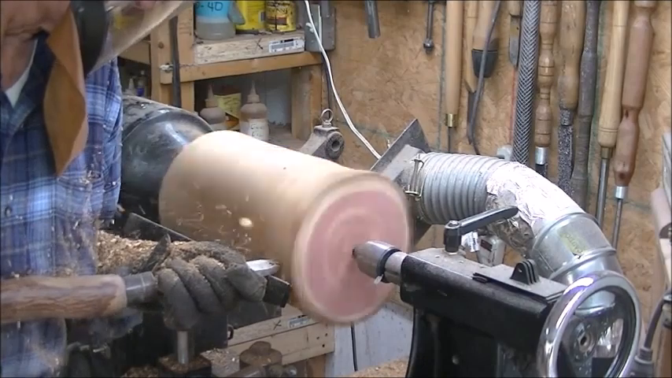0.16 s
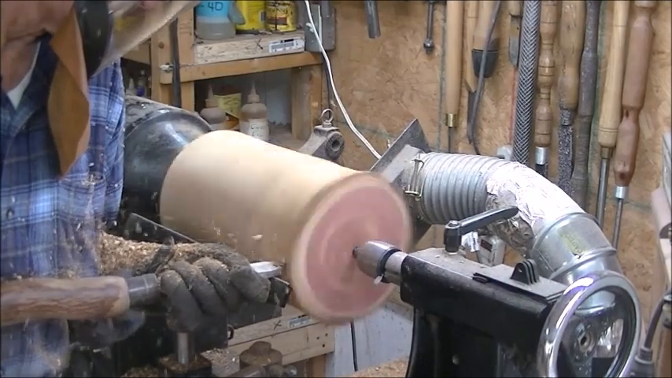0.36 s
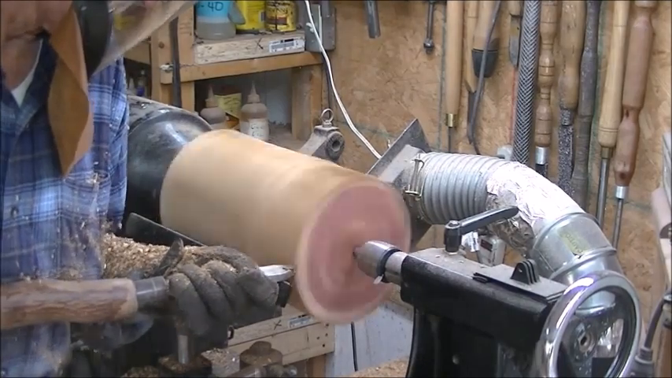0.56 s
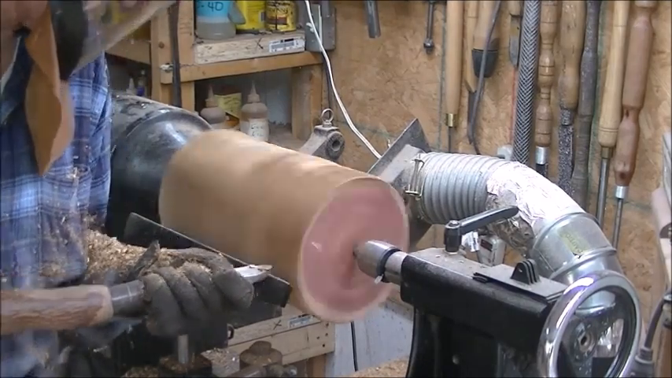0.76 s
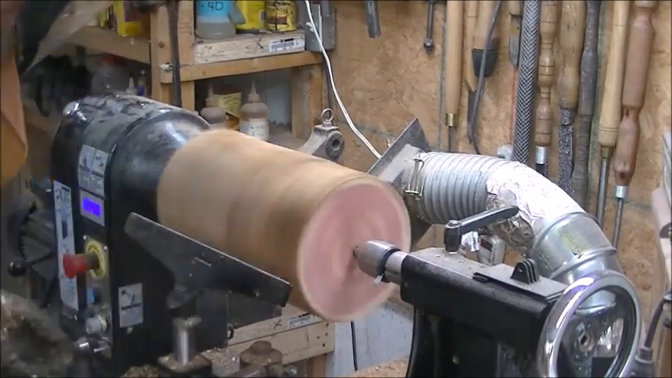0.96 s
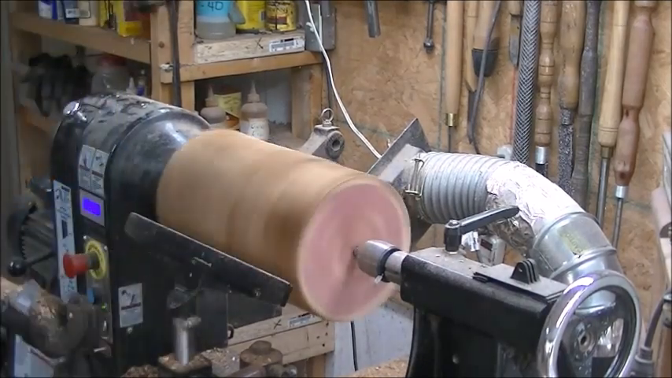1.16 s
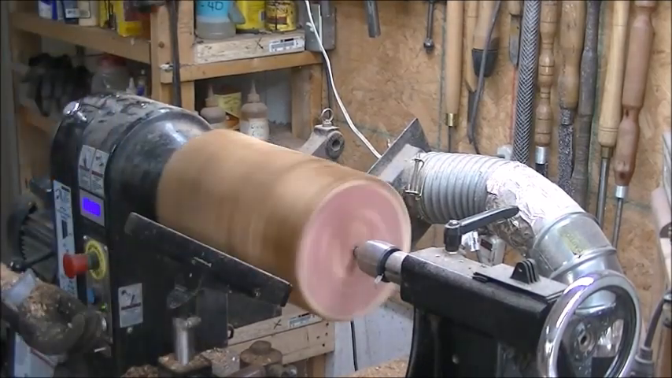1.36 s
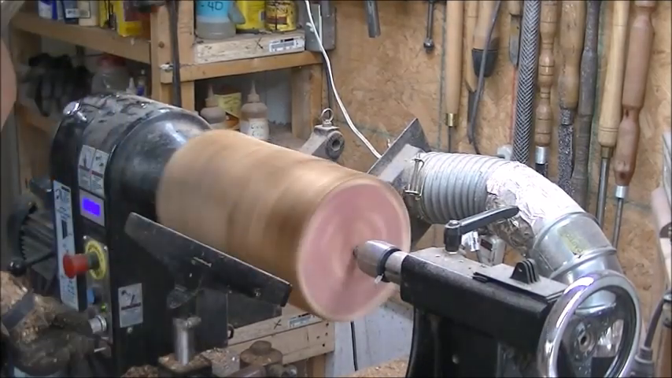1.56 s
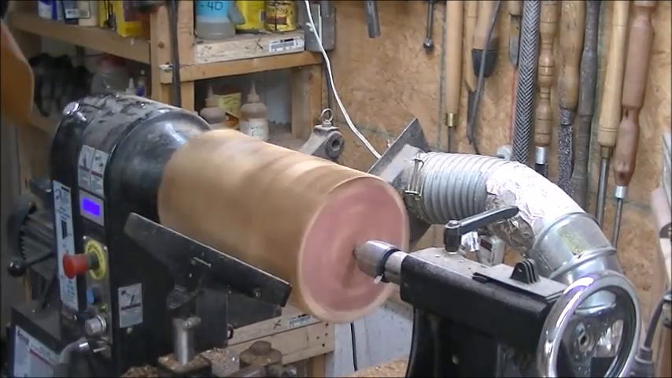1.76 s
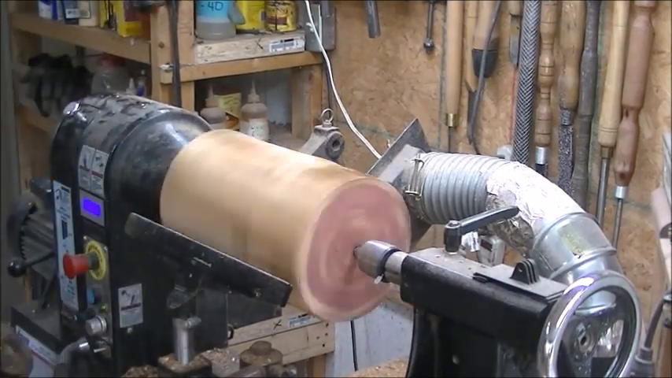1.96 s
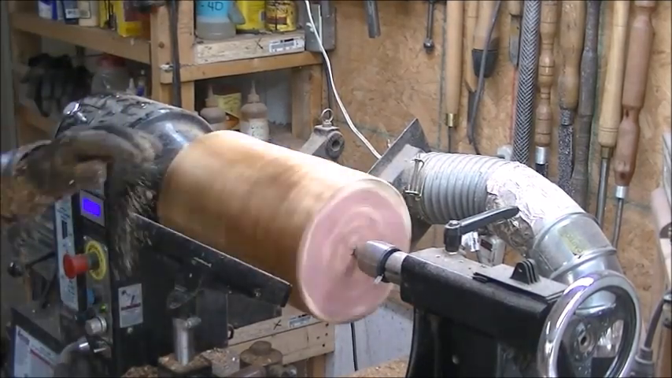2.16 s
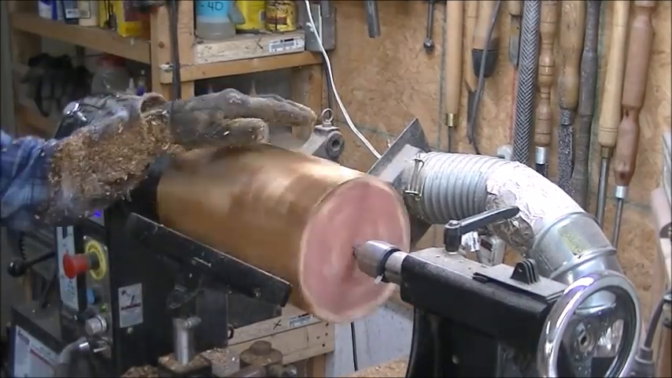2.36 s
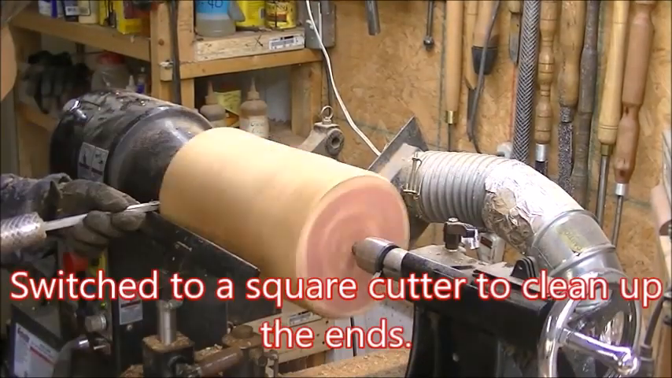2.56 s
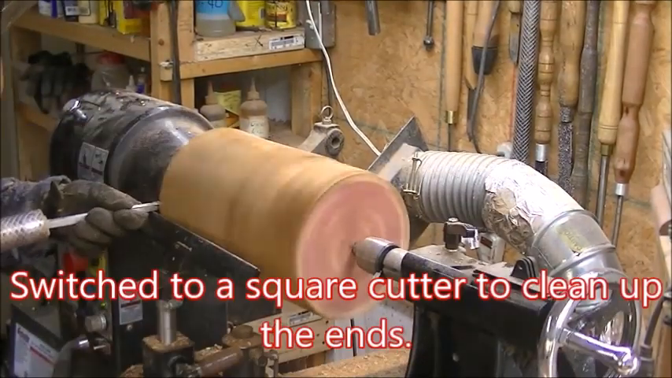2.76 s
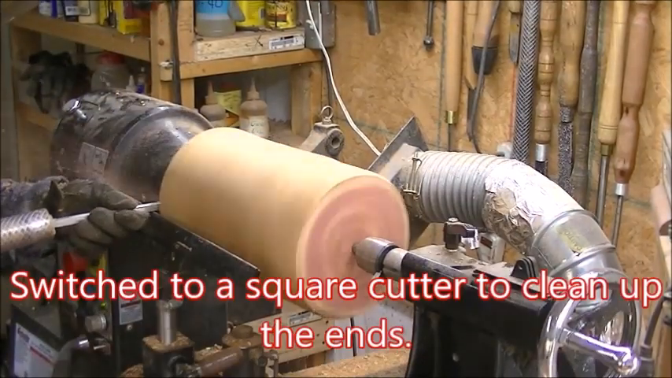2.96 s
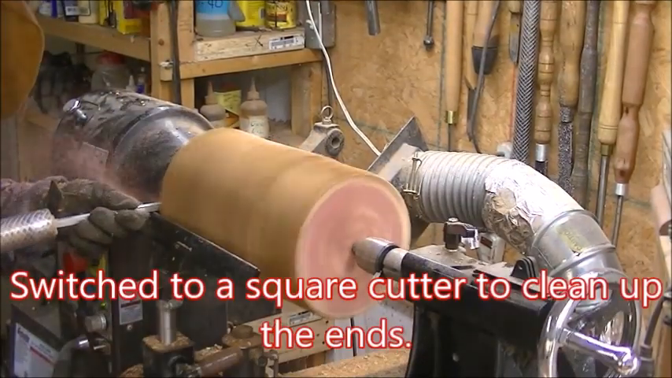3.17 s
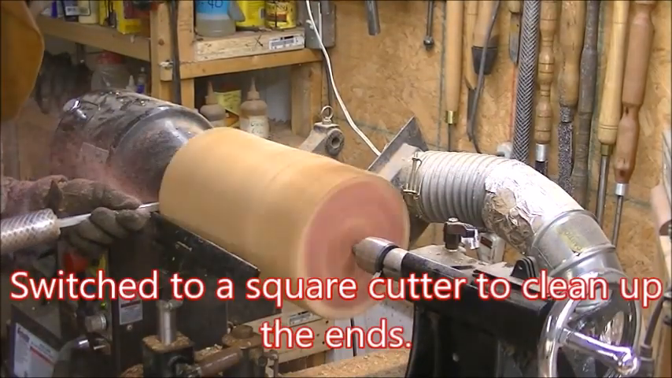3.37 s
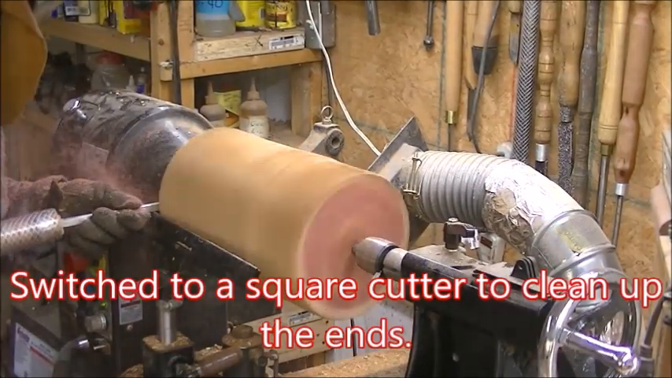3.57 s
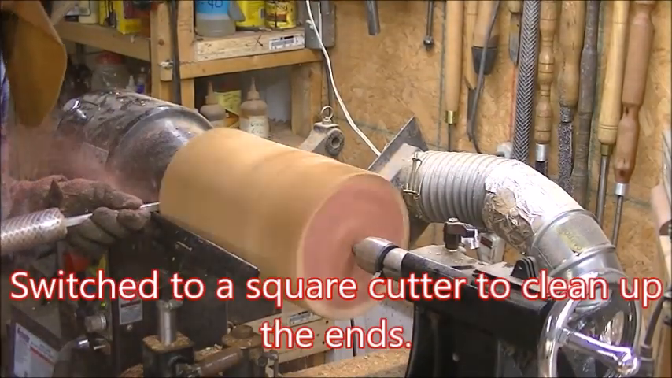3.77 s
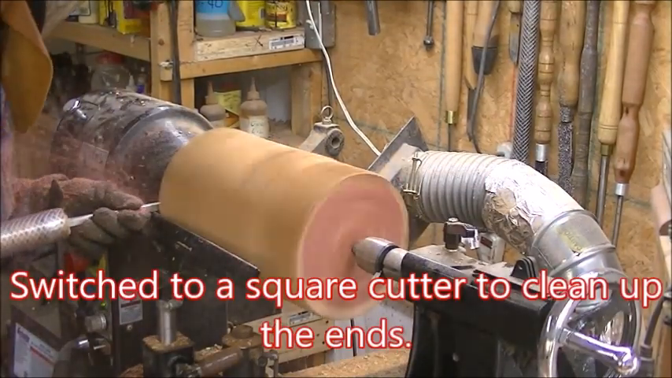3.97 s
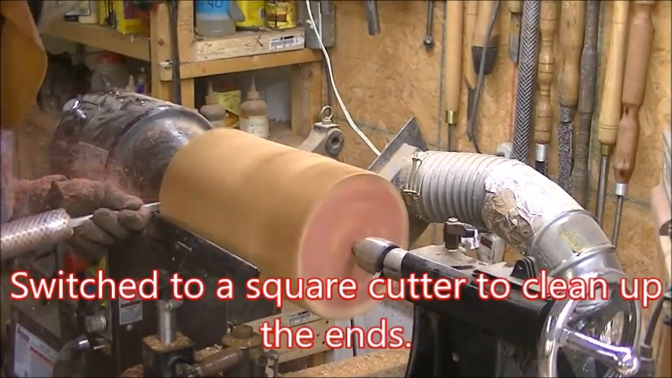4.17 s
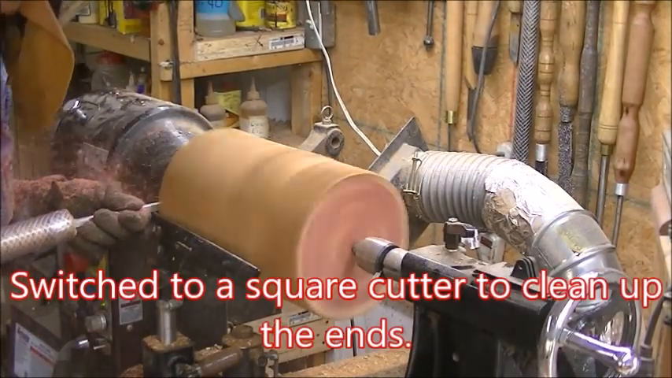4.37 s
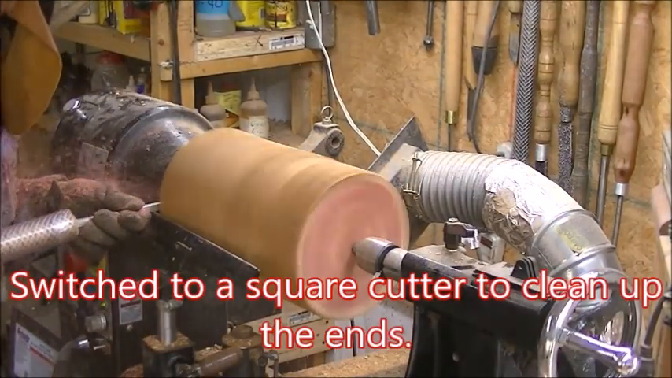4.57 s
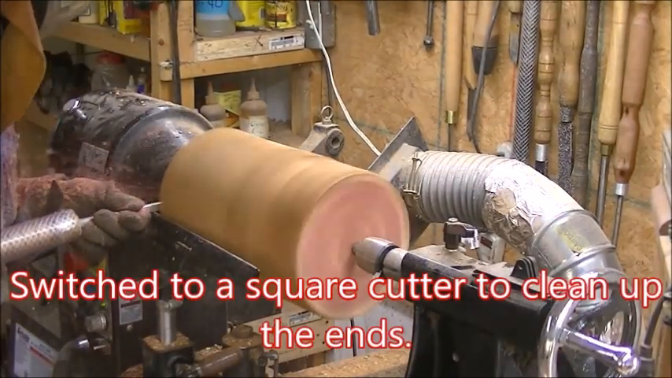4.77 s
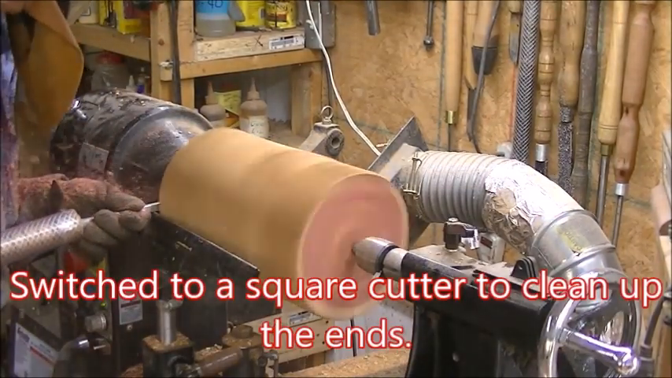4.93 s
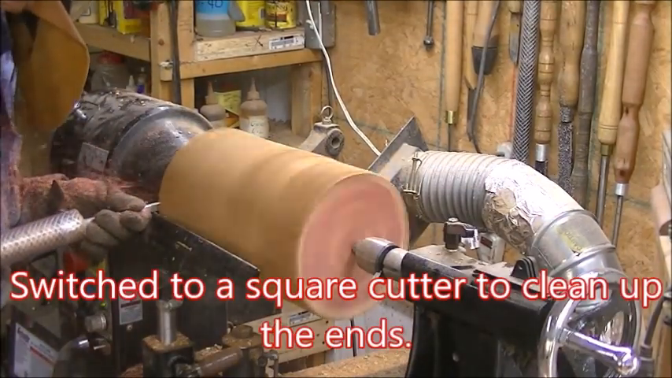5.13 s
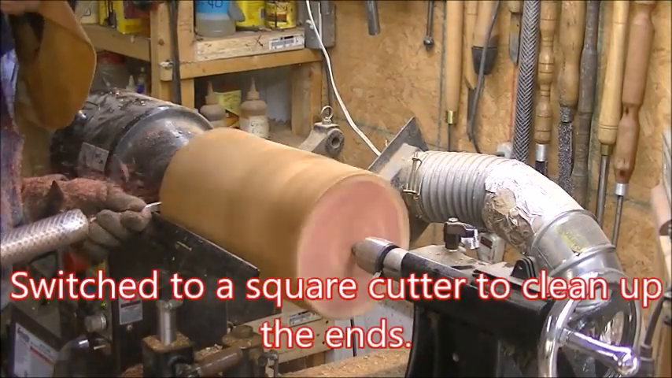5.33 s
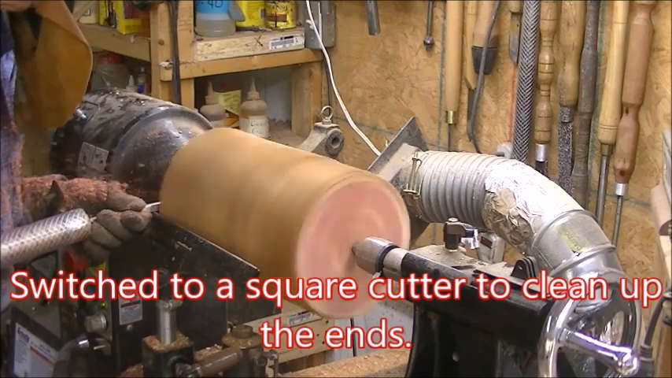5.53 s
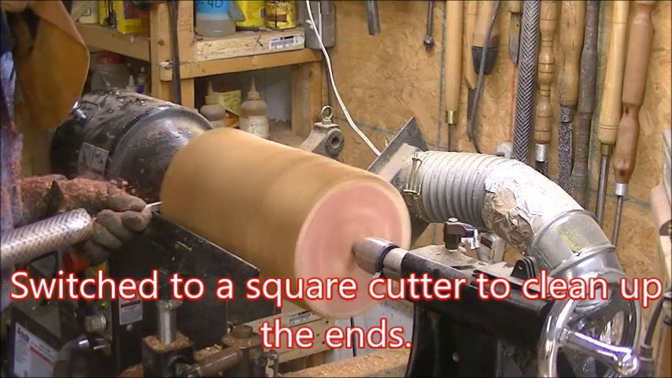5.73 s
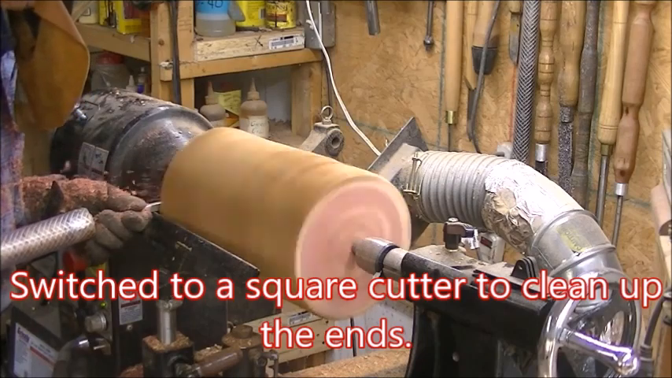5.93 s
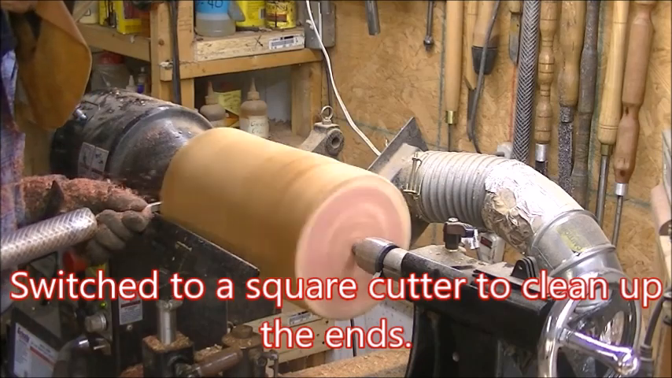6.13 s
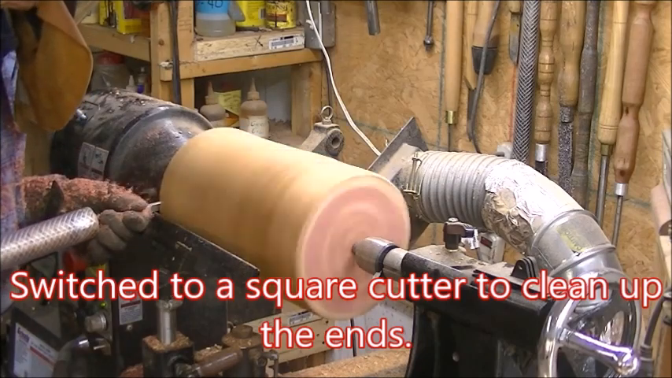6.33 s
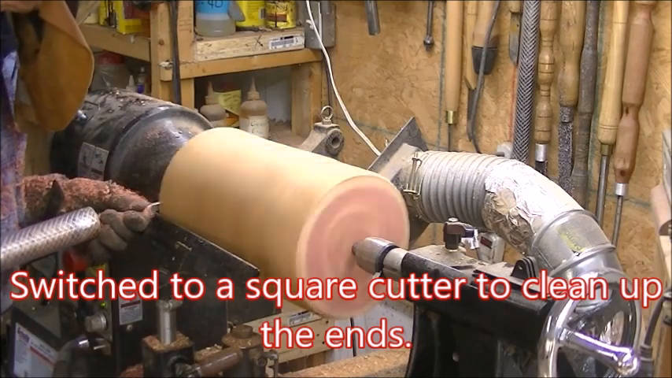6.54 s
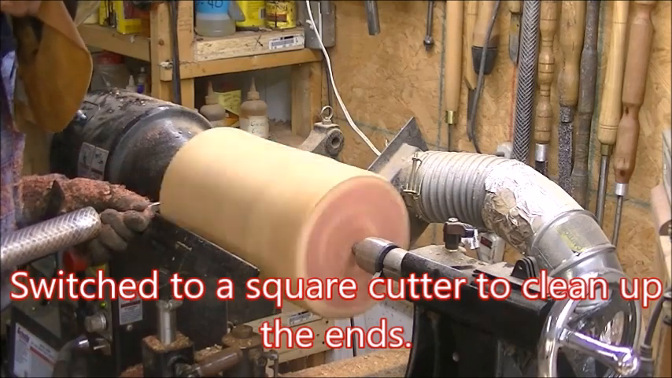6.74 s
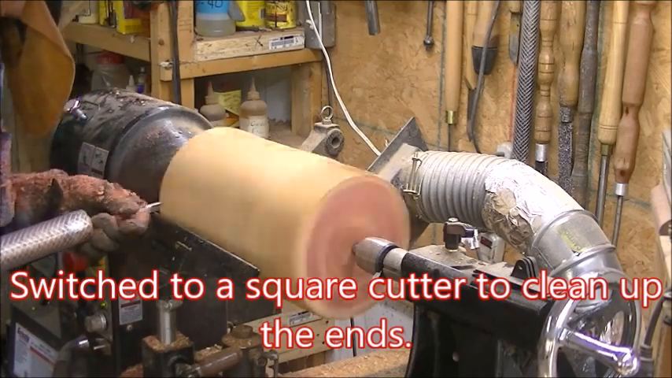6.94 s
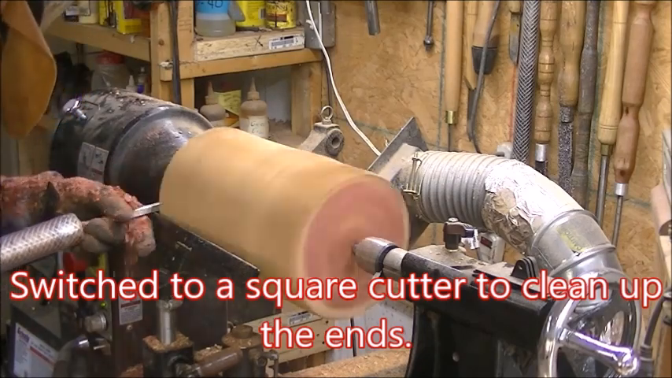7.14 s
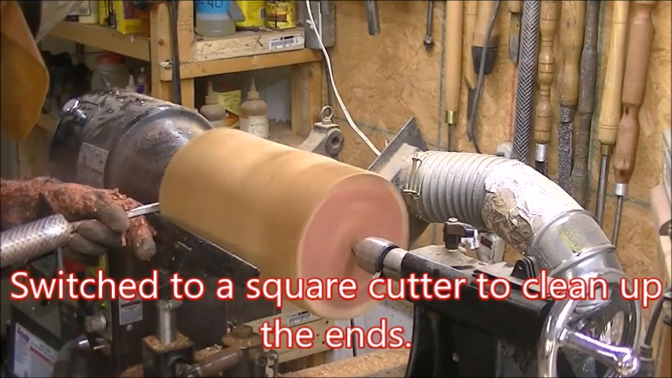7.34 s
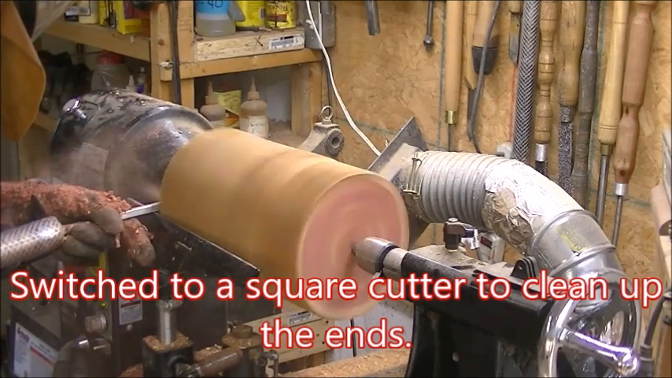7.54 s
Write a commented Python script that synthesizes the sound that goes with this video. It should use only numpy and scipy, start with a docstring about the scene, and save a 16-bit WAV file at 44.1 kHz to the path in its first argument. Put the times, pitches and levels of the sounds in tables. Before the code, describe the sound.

Gouge hisses harshly on spinning wood, lifts off, lathe whines down with soft knocking, restarts, then a square cutter grinds a long loud raspy hiss.

```python
"""Roughing and grooving on a wood lathe

A gouge roughs a spinning blank, lifts away, and the lathe coasts down with a falling whine.
It runs up again and a square cutter sinks a groove into the end, its hiss darkening with depth.
The cuts are grainy noise through resonances; the whine is made of sines tied to the spindle speed.
Puffs of air and shavings are short bursts of noise at two microphone ports.
The small, dry workshop answers with short tails of fading noise."""
import sys
import numpy as np
from scipy import signal
from scipy.fft import rfft, irfft, next_fast_len
from scipy.io import wavfile
from scipy.ndimage import uniform_filter1d, map_coordinates

SR = 44100
rng = np.random.default_rng(int(sys.argv[2]) if len(sys.argv) > 2 else 0)


def transcribe(signal):
    """Save signal, clipped to [-1, 1], as a 16-bit WAV file at the path in sys.argv[1]."""
    frames = np.atleast_2d(signal).T
    limited = np.clip(frames, -1, 1)
    pcm = np.round(limited * 32767).astype(np.int16)
    wavfile.write(sys.argv[1], SR, pcm)


N = 339570

# In every spectrum below (relative level [dB per Hz]) only the shape counts; its loudness is set elsewhere.
# strokes of the gouge: (start [s], end [s], level [dB])
GOUGE_STROKES = [(-0.02, 0.62, -18), (0.71, 0.71, -15), (0.735, 0.831, -17.5)]
# how hard the cutter is pressed, easing off at the bottom of the groove: (time [s], level [dB])
CUTTER_PRESSURE = [(2.78, -40), (2.86, -27), (2.885, -19), (3.05, -16), (4.7, -15.5), (5.8, -16),
                   (6.78, -18.5), (6.83, -28), (6.87, -28.5), (6.9, -20), (7.01, -19), (7.07, -15),
                   (7.22, -21.5), (7.36, -16), (7.45, -19), (7.7, -16)]
# the cutter grazes the blank before it bites: (start [s], end [s], level [dB])
CUTTER_GRAZES = [(2.763, 2.77, -20), (2.848, 2.852, -20), (2.868, 2.876, -19)]
# the cutter sinks in slowly and is drawn back quickly: (time [s], depth [mm])
CUTTER_DEPTH = [(2.87, 0), (3.05, 0.63), (3.4, 0.6), (4.1, 5), (4.8, 14), (5.6, 20.5), (6.9, 25),
                (7.1, 19.5), (7.3, 8.5), (7.4, 5), (7.52, 2), (7.7, 1)]
# strength of the slot's resonance in a firm cut: (depth [mm], lift [dB])
SLOT_LIFT = [(0, 1.5), (.55, 12.5), (4, 7.5), (12, 2.5), (23, 11)]
# fibres tearing under the gouge: (frequency [Hz], relative level [dB per Hz])
GOUGE_SPECTRUM = [(150, -54), (350, -47), (600, -51), (900, -20), (1150, -13.5), (1350, -8), (1550, -11),
                  (2100, -9), (3000, -3), (4200, -4), (6000, -4), (9000, 0.5), (15600, -5.5)]
# fibres tearing under the cutter: (frequency [Hz], relative level [dB per Hz])
CUTTER_SPECTRUM = [(150, -52), (350, -45.5), (600, -29.5), (900, -16), (1150, -14), (1350, -9.5),
                   (1550, -10.5), (2100, -20.5), (3000, 1.5), (4200, -0.5), (6000, -1.5), (9000, 1.5),
                   (15600, 2.5)]
# blank, rest and gouge ringing: (frequency [Hz], width [Hz], lift [dB])
GOUGE_RESONANCES = [(1508, 44, 7.8), (1685, 165, 10.1), (1906, 28, 10.9), (2304, 143, 6.7), (2664, 61, 8.8),
                    (2906, 127, 10.5), (5262, 138, 8.8), (5535, 101, 10.0), (5791, 153, 13.1),
                    (6055, 248, 10.1), (6791, 117, 7.1), (7637, 699, 5.4), (9792, 299, 7.6),
                    (12417, 238, 7.9)]
# blank, rest and cutter ringing: (frequency [Hz], width [Hz], lift [dB])
CUTTER_RESONANCES = [(1574, 188, 16.0), (1693, 97, 14.9), (1840, 117, 13.0), (1997, 274, 16.0),
                     (2271, 405, 16.0), (2491, 253, 16.0), (2677, 31, 7.7), (2808, 25, 11.2),
                     (2934, 144, 13.3), (3143, 234, 9.8), (3789, 71, 4.5), (4354, 63, 5.4),
                     (4608, 320, 6.2), (5218, 43, 5.9), (5416, 593, 9.9), (5828, 118, 5.7),
                     (6198, 399, 8.0), (6900, 437, 6.5), (7775, 699, 7.8), (8540, 232, 4.8),
                     (9864, 399, 10.4), (10247, 139, 6.5), (10510, 120, 4), (11300, 260, 6),
                     (12350, 150, 4), (12780, 380, 10), (14225, 699, 5.8)]
# modes of the rest that the shank wakes as it nears them: (frequency [Hz], width [Hz], full lift [dB])
REST_RESONANCES = [(3835, 330, 14.5), (4270, 220, 9), (4630, 240, 11.5)]
# the bearings' whirr before the restart: (frequency [Hz], relative level [dB per Hz])
WHIRR_SPECTRUM = [(88, -85), (150, -50), (420, -20), (1290, -6.5), (2270, -4), (2500, -7), (2860, -1),
                  (4480, -5), (7130, -6.5), (14100, -17.5), (15500, -20)]
# the spindle's dull knock: (frequency [Hz], relative level [dB per Hz])
KNOCK_SPECTRUM = [(200, -41), (600, -14), (900, -4.5), (1400, 1), (2000, -4), (4000, -7), (12000, -19.5)]
# the restarted lathe: (frequency [Hz], relative level [dB per Hz])
RUN_UP_SPECTRUM = [(150, -43), (300, -40), (700, -23), (1000, -14.5), (1600, -2.5), (3000, -3),
                   (3800, -2.5), (4800, -1), (8000, -4.5), (15000, -9.5)]
# the drive's whine by its pitch, before swells and fits: (frequency [Hz], level [dB])
WHINE_LEVELS = [(1500, -50.5), (3700, -53.5), (4700, -49.5), (6500, -51), (8000, -68), (14000, -72)]
# its upper partial by its own pitch, before swells and fits: (frequency [Hz], level [dB])
UPPER_WHINE_LEVELS = [(4300, -76), (5700, -53.5), (6500, -54), (8000, -66), (14000, -75)]
# housing resonances that the whine sweeps through: (frequency [Hz], width [Hz], lift [dB])
HOUSING_RESONANCES = [(2740, 770, 18), (5830, 2000, 10.5)]
# tones of the motor until the power is cut: (frequency [Hz], level [dB])
MOTOR_TONES = [(1906, -43.5), (5560, -48.5), (5862, -50)]
# hum of the restarted lathe: (frequency [Hz], level [dB])
HUM_TONES = [(203, -91), (608, -79)]
# brief squeaks as the spindle slows: (time [s], frequency [Hz], peak level [dB], length [s])
SQUEAK_LIST = [(1.794, 2110, -43, 0.016), (1.845, 2130, -42, 0.018), (1.91, 2070, -39, 0.023),
               (1.912, 4080, -39.5, .02), (1.912, 2600, -41, 0.012)]
# the strongest puffs on the microphone ports: (time [s], peak level [dB], length [s])
STRONG_PUFFS = [(0.353, -41.5, 0.071), (0.417, -40.5, .021), (0.533, -37, .02), (0.715, -34.5, 0.03),
                (0.925, -35, 0.023), (0.966, -33.5, 0.018), (1.006, -31.5, 0.013), (1.2, -34, .033),
                (1.238, -36, .014), (1.32, -39.5, 0.031), (1.556, -40.5, 0.067), (1.925, -41, 0.048),
                (2.356, -34, 0.022), (2.506, -39, 0.017), (5.238, -34, 0.042), (5.469, -29.5, 0.034),
                (5.545, -40.5, 0.043), (5.635, -39, 0.024), (6.026, -27.5, 0.048), (6.279, -39, 0.026),
                (6.333, -32, 0.0077), (6.5, -26, 0.04), (6.617, -40, 0.03), (6.765, -39.5, 0.074)]
# spells of weaker, random puffs: (start [s], end [s], middle level [dB])
WEAK_PUFF_SPELLS = [(0.36, 1.754, -58.5), (5.207, 6.752, -50.5)]
# rustle of a puff: (frequency [Hz], relative level [dB per Hz])
PUFF_SPECTRUM = [(60, -61), (150, -30.5), (300, -13.5), (550, 1.5), (1000, 8.5), (1600, 6), (3000, -4),
                 (8000, -26)]
# still air of the shop: (frequency [Hz], relative level [dB per Hz])
AIR_SPECTRUM = [(25, -24), (150, -18.5), (300, -13), (600, -1.5), (1500, 13), (5000, -1), (15000, -47)]

POWER_OFF, RESTART, FIRST_BITE = 1.2, 2.56, 2.865  # s
KNOCK_AT = 2.263  # s, one moment when the high spot comes round
SLOW, RESUME, FAST = 50.3, 42.2, 65.2  # end-grain passes a second: roughing, start of the run-up, top speed
BRAKE, SPIN_UP = 26.8, 28  # passes a second lost or gained each second
ATTACK_S, RELEASE_DB_PER_S = 0.009, 550  # the edge catches quickly and slips out more slowly
THROB_DEEP_DB, THROB_SURFACE_DB = 1.37, 1.37  # throb at any depth, and its extra at the surface
ROUNDING_MM = 1.7  # that extra fades over this depth, as the cut rounds the blank off
FIRM_DB, LIGHT_RANGE_DB = -16, 8  # a cut counts as light from this level down, fully so this much lower
LIGHT_THROB_DB, LIGHT_SLOT_LOSS = 1, 0.5  # a light cut throbs more and loses this share of the slot's lift
DIP_DB = -32.5  # a puff this strong halves the power of the cutter's hiss
SOUND_MM_PER_S = 343000
LIP_MM = 5.35  # the groove is a quarter-wave slot, longer than its depth by this much
SHANK_HZ, SHANK_SAG_HZ_PER_MM = 4746, 49.2  # the shank rings lower as it reaches further over the rest
SHANK_STILL, RUB_MM_PER_S = 0.31, 8.7  # share of the rest's lift with the tool still; scale of the feed speed
WHIRR_DB, WHIRR_DB_PER_DECADE = -37.5, 17.5  # the whirr at roughing speed, and its growth with speed
KNOCK_DB, SLOW_KNOCK_DB = -46.5, 6  # the knock at roughing speed, and how much it gains towards rest
WHINE_ORDER = 107.4  # whine cycles per end-grain pass
STEADY_WHINE_DB = -5  # the whine is weaker until the power is cut
TOP_HZ = 15780  # nothing is kept from here up


def gouge():
    """The gouge bites hard at each pass of the end grain, and the torn fibres make blank and rest ring."""
    throb_db = 2.8 * bite(passes(origin=.013), decay=.6)
    tear = fibres(throb_db, grain_db=-0.4, snap_rate=190, snap_db=3.5, snap_life=0.0014)
    return pressure(GOUGE_STROKES) * unit(coloured(tear, GOUGE_SPECTRUM, GOUGE_RESONANCES))


def cutter():
    """The square cutter throbs most at the surface, cuts raggedly when deep, and dips at each strong puff."""
    depth = curves(CUTTER_DEPTH)[0]
    level_db = curves(CUTTER_PRESSURE)[0]
    light = np.clip((FIRM_DB - level_db) / LIGHT_RANGE_DB, 0, 1)  # 0 firm, 1 light

    throb_size_db = THROB_DEEP_DB + THROB_SURFACE_DB * np.exp(-depth / ROUNDING_MM) + LIGHT_THROB_DB * light
    soft_bite = uniform_filter1d(bite(passes(FIRST_BITE), decay=.9), size=130)
    throb_db = throb_size_db * unit(soft_bite)
    # a slower beat for part of the cut
    flutter_db = 1.1 * between(3.6, 5.4, fade=.4) * np.sin(2 * np.pi * 54.4 * clock())
    ragged_db = (0.61 + 1.08 * (1 - light) * depth / depth.max()) * wobble(130)
    tear = fibres(throb_db + flutter_db + ragged_db,
                  grain_db=1.47, snap_rate=120, snap_db=3, snap_life=0.00084)

    cut_gain = amp(level_db) * between(CUTTER_PRESSURE[0][0], N / SR)
    press = np.maximum(pressure(CUTTER_GRAZES), cut_gain)
    dip = 1 / np.hypot(1, puff_force() / amp(DIP_DB))
    return press * dip * groove(coloured(tear, CUTTER_SPECTRUM, CUTTER_RESONANCES), depth, light)


def fibres(throb_db, grain_db, snap_rate, snap_db, snap_life):
    """Tearing wood: grainy noise that throbs, with chips snapping off at random and dying away quickly."""
    chips = (rng.random(N) < snap_rate / SR) * rng.random(N)
    snaps = signal.lfilter([1], [1, -np.exp(-1 / (snap_life * SR))], chips)
    grain = rng.standard_normal(N) * amp(throb_db + grain_db * wobble(1500))
    return grain * (1 + amp(snap_db) * np.tanh(snaps))


def bite(phase, decay):
    """A sharp rise and a slower fall once a cycle, mean 0 and rms 1."""
    pulse = np.exp(-(phase % 1) / decay)
    return unit(pulse - pulse.mean())


def pressure(strokes):
    """Gain of a tool's strokes: a short rise before the start, a hold, then a steady fall in dB."""
    t = clock()
    gains = []
    for start, end, db in strokes:
        attack = np.clip(1 + (t - start) / ATTACK_S, 0, 1)
        gains.append(attack * amp(db - RELEASE_DB_PER_S * np.maximum(t - end, 0)))
    return np.max(gains, axis=0)


def groove(x, depth, light):
    """Slot and shank both resonate lower as the cut deepens; their gain evens out the total power."""
    hz, t, z = signal.stft(x, SR, nperseg=512)
    mm = np.interp(t, clock(), depth)
    feed = np.abs(np.gradient(mm, t))
    rub = SHANK_STILL + (1 - SHANK_STILL) * np.tanh(feed / RUB_MM_PER_S)
    near_shank = hump(hz, SHANK_HZ - SHANK_SAG_HZ_PER_MM * mm, octaves=0.072)
    shank_db = rub * resonances(REST_RESONANCES, hz)[:, None] * near_shank

    lightness = np.interp(t, clock(), light)
    lift_db = np.interp(mm, *np.transpose(SLOT_LIFT)) * (1 - LIGHT_SLOT_LOSS * lightness)
    slot_hz = SOUND_MM_PER_S / 4 / (mm + LIP_MM)
    gain = amp(shank_db + lift_db * hump(hz, slot_hz, octaves=0.5))

    power = np.mean(np.abs(z) ** 2, axis=1)
    even_gain = gain / np.sqrt(power @ gain ** 2)
    return unit(signal.istft(z * even_gain, nperseg=512)[1][:N])


def bench(x, t60, wet_db, echo_db):
    """Bed and bench scatter the cut into fine ripples, alike at both ports; the back wall adds one echo."""
    wall = np.pad(x, (round(.00786 * SR), 0))[:N]  # the echo's delay in s
    scatter = workshop(x, t60)[0]
    return (x + amp(echo_db) * wall + amp(wet_db) * scatter) / np.sqrt(1 + amp(wet_db) ** 2)


def machine():
    """Bearings, a fitful drive whine tied to spindle speed, motor tones until power-off, and a later hum."""
    powered = between(0, POWER_OFF, fade=0.013)
    lower = whine(WHINE_ORDER, WHINE_LEVELS, .9 * wobble(220))
    upper = whine(2.38 * WHINE_ORDER, UPPER_WHINE_LEVELS, 1.5 * wobble(500))
    fits_db = 2.5 * wobble(120) + 6 * np.tanh(wobble(22)) - 2
    drive = amp(fits_db + STEADY_WHINE_DB * powered) * (lower + upper)
    motor = tones(MOTOR_TONES, waver=0.32) * powered
    hum = tones(HUM_TONES, waver=0.53) * between(2.9, 10.0, fade=.2)
    return bearings() + drive + motor + hum


def speed():
    """End-grain passes a second: steady, coasting down, then restarting at a higher speed and running up."""
    t = clock()
    coast = SLOW - BRAKE * np.maximum(t - POWER_OFF, 0)
    run_up = np.minimum(RESUME + SPIN_UP * (t - RESTART), FAST)
    return np.where(t < RESTART, coast, run_up)


def passes(origin=0):
    """Count of end-grain passes since the time origin, from adding up the speed."""
    count = np.cumsum(speed()) / SR
    return count - np.interp(origin, clock(), count)


def bearings():
    """A whirr rippling three times a pass; its dull knock stands out in the coast; a rush after restart."""
    phase = passes(KNOCK_AT)
    whirr_db = WHIRR_DB + WHIRR_DB_PER_DECADE * np.log10(speed() / SLOW)
    ripple_db = 0.28 * bite(3 * phase, decay=0.48)
    whirr = amp(whirr_db + ripple_db) * unit(coloured(ports(spread=0.03), WHIRR_SPECTRUM))

    age = (phase % 1) / speed() / .0017  # each knock peaks 1.7 ms after the high spot
    knocks = unit(coloured(ports(spread=0.14) * age * np.exp(-age), KNOCK_SPECTRUM))
    knock = amp(KNOCK_DB + SLOW_KNOCK_DB * (1 - speed() / SLOW)) * knocks

    run_up = amp(-36.5) * unit(coloured(ports(spread=0.024), RUN_UP_SPECTRUM))
    first_run = between(0, RESTART)
    return first_run * (whirr + knock) + (1 - first_run) * run_up


def whine(multiple, levels, waver):
    """A partial tied to the spindle; it swells as it crosses the housing's resonances."""
    hz = multiple * speed()
    gain = amp(along(levels, hz) + resonances(HOUSING_RESONANCES, hz))
    return gain * np.sqrt(2) * np.sin(2 * np.pi * multiple * passes() + waver)


def tones(lines, waver):
    """Held tones whose phase wavers slightly, by waver in radians."""
    return sum(amp(db) * np.sqrt(2) * np.sin(2 * np.pi * hz * clock() + waver * wobble(40))
               for hz, db in lines)


def squeaks():
    """Short chirps: sine tones that swell and fade, all with the same unsteady phase."""
    waver = 0.59 * wobble(200)
    return sum(amp(db) * swell(s, length) * np.sqrt(2) * np.sin(2 * np.pi * hz * clock() + waver)
               for s, hz, db, length in SQUEAK_LIST)


def puffs():
    """Air and shavings flung off the blank rustle differently on each port."""
    spells = sum(amp(db) * between(start, end, fade=0.068) for start, end, db in WEAK_PUFF_SPELLS)
    weak_force = amp(7.6 * np.tanh(wobble(25))) * spells
    eddies = ports(spread=.85) * amp(3.9 * wobble(400))
    return (puff_force() + weak_force) * unit(coloured(eddies, PUFF_SPECTRUM))


def puff_force():
    """Strength of the strong puffs over time, each a bell-shaped swell."""
    return sum(amp(db) * swell(s, length) for s, db, length in STRONG_PUFFS)


def workshop(x, t60):
    """A short diffuse answer from shelves and walls: noise that fades by 60 dB in t60 seconds."""
    t = np.arange(SR // 3) / SR
    tail = rng.standard_normal((2, len(t))) * amp(-60 * t / t60)
    return signal.fftconvolve(x[None], tail / np.linalg.norm(tail[0]), axes=1)[:, :N]


def still_air():
    """The faint steady noise of the shop's air, nearly alike at both ports."""
    return amp(-58.5) * unit(coloured(ports(spread=0.073), AIR_SPECTRUM))


def ports(spread):
    """White noise at two ports; spread is the unlike part against the common part."""
    mid, side = rng.standard_normal((2, N))
    return unit(np.array([mid + spread * side, mid - spread * side]))


def coloured(x, slope, modes=()):
    """x through a causal body: a broad slope with resonances standing on it."""
    m = 2 * next_fast_len(N // 2 + 8192)
    hz = np.fft.rfftfreq(m, 1 / SR)
    # folding the cepstrum makes the body ring only after it is struck
    cepstrum = irfft(np.log(amp(along(slope, hz) + resonances(modes, hz))))
    cepstrum[1:m // 2] *= 2
    cepstrum[m // 2 + 1:] = 0
    return irfft(rfft(x, m) * np.exp(rfft(cepstrum)), m)[..., :N]


def resonances(modes, hz):
    """Lift in dB of (frequency [Hz], width [Hz], lift [dB]) resonances."""
    return sum(lift / (1 + (2 * (hz - centre) / width) ** 2) for centre, width, lift in modes)


def hump(hz, centre, octaves):
    """Bell around a moving centre, 0 to 1, frequency by time."""
    offset = np.log2(hz + 1)[:, None] - np.log2(centre)
    return np.exp(-.5 * (offset / octaves) ** 2)


def along(points, hz):
    """Values between (frequency [Hz], value) points, read on a log axis."""
    f, v = np.transpose(points)
    return np.interp(np.log(hz + 1), np.log(f + 1), v)


def curves(rows):
    """One value per sample for each column after the time."""
    s, *cols = np.transpose(rows)
    return [np.interp(clock(), s, c) for c in cols]


def between(start, end, fade=0.0044):
    """1 from start to end, with short ramps outside."""
    return np.clip(1 + np.minimum(clock() - start, end - clock()) / fade, 0, 1)


def swell(s, length):
    """A bell-shaped rise and fall around s."""
    return np.exp(-2 * ((clock() - s) / length) ** 2)


def wobble(rate):
    """A smooth random curve through rate random points a second."""
    return map_coordinates(rng.standard_normal(int(N * rate / SR) + 4), [np.arange(N) * rate / SR])


def clock():
    """Seconds at each sample."""
    return np.arange(N) / SR


def amp(db):
    """Decibels to gain."""
    return 10 ** (np.asarray(db) / 20)


def unit(x):
    """Scaled to rms 1."""
    return x / np.sqrt(np.mean(x ** 2) + 1e-20)


def scene():
    """The cuts straight ahead with their room sound, then the machine, squeaks, puffs and still air."""
    cut = bench(gouge() + cutter(), t60=0.17, wet_db=-5.0, echo_db=-13.5)
    room = amp(-25) * workshop(cut, t60=0.12)
    return cut + room + machine() + squeaks() + puffs() + still_air()


def record(dry):
    """Rounds off the tallest peaks, fades both ends briefly and keeps nothing from TOP_HZ up."""
    rounded = dry / (1 + np.abs(dry / .95) ** 8) ** (1 / 8)
    faded = rounded * between(.003, N / SR - .003, fade=.003)
    m = next_fast_len(N + SR // 2)
    return irfft(rfft(faded, m) * (np.fft.rfftfreq(m, 1 / SR) < TOP_HZ), m)[:, :N]


dry = scene()
out = record(dry)
transcribe(out)
```